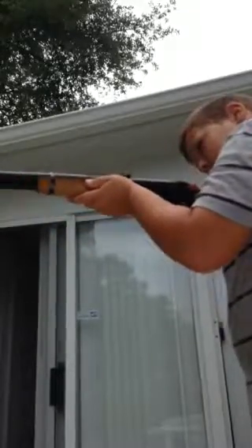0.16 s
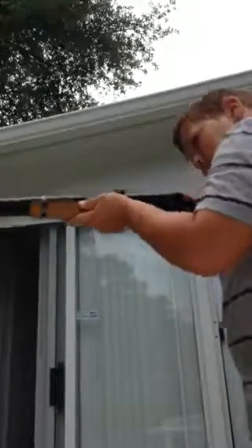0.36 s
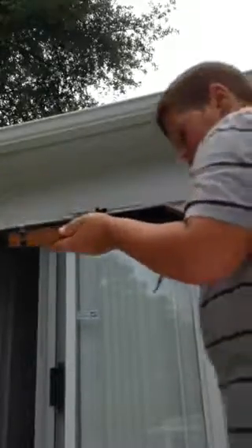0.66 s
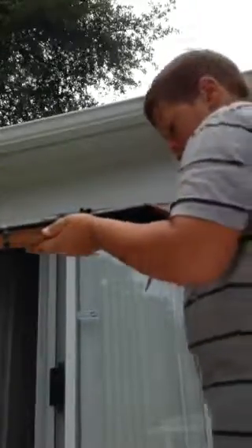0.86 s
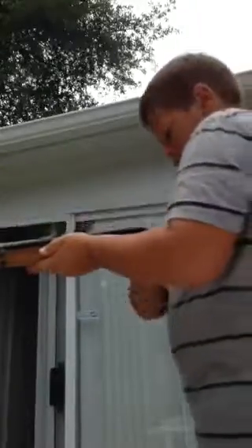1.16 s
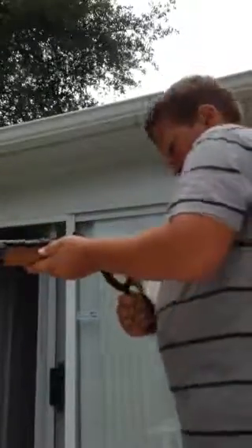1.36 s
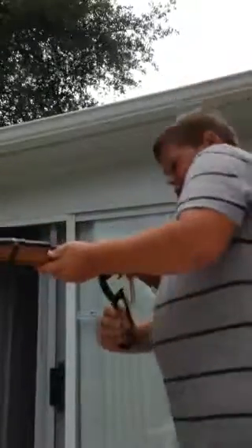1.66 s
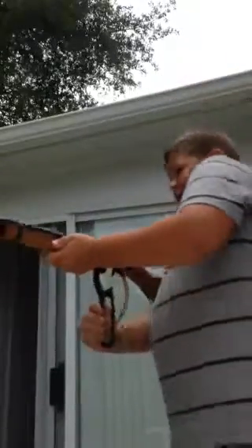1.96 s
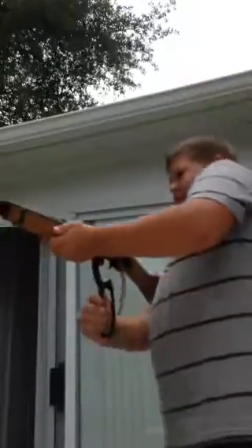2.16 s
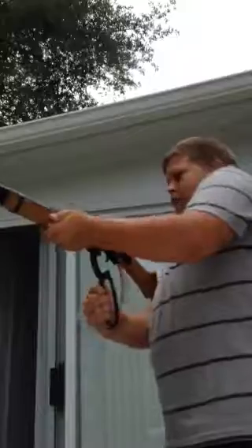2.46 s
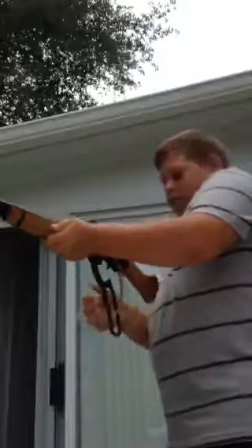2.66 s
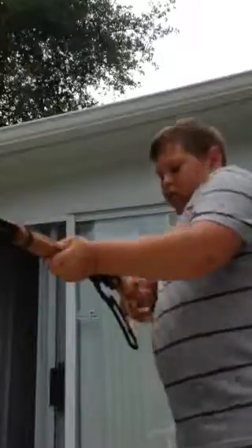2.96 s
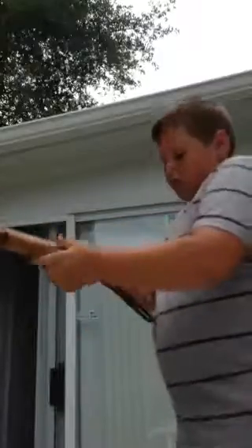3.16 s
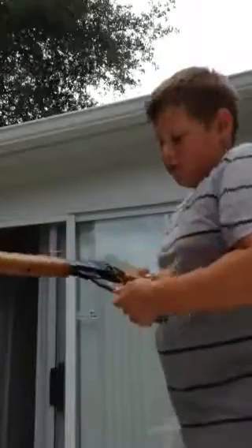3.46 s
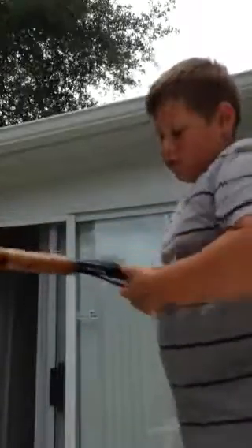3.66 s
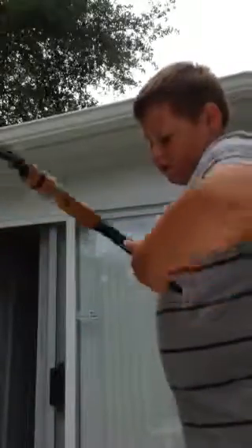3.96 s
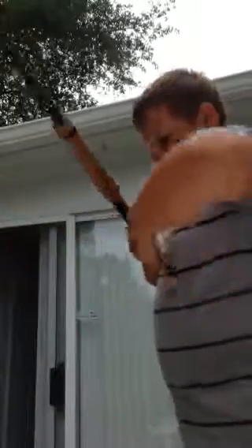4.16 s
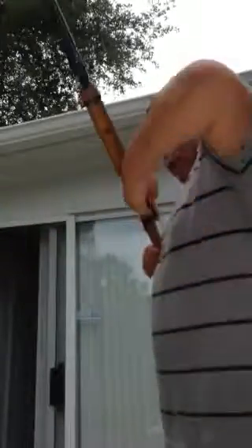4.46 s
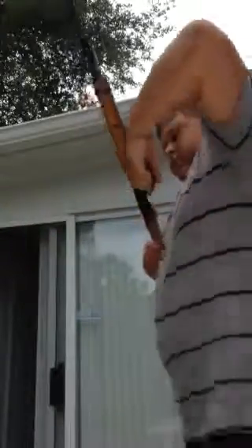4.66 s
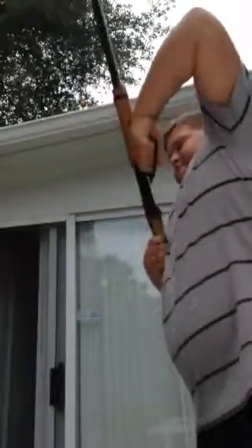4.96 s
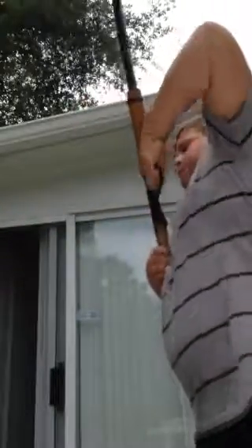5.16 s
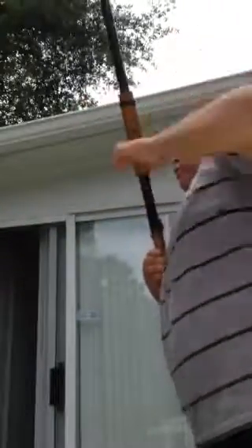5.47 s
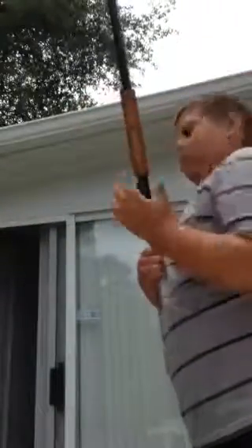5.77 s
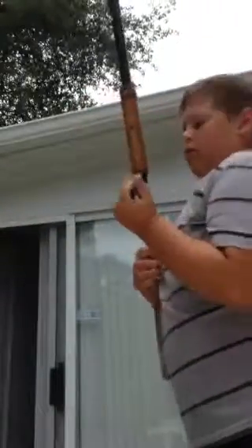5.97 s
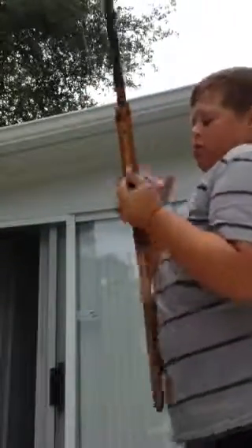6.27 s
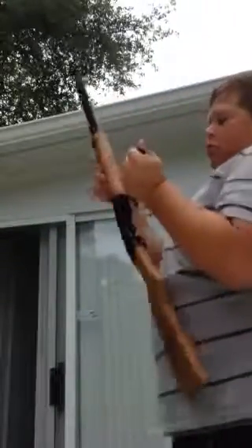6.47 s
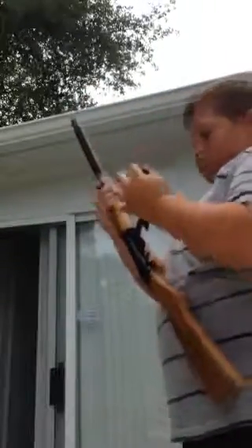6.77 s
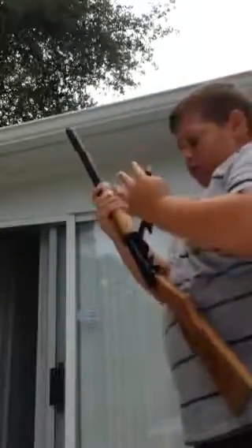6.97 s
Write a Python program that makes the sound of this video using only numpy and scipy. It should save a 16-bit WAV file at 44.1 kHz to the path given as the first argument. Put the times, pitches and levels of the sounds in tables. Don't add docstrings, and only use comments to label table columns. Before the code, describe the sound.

An air rifle is handled close to the microphone on a patio. Bright pellet ticks and short rolls come first, then two hard metallic lever clacks. More pellets scatter, then the whole load rushes down the tube amid three harder snaps. Smaller rattles and soft wood-and-metal knocks finish it. Wall and eave return short, scattered echoes over a faint fan hum, insects, far birds and airy hiss.

```python
import sys
import numpy as np
from scipy import signal
from scipy.fft import rfft, irfft
from scipy.io import wavfile
from scipy.ndimage import uniform_filter1d

SR = 44100
rng = np.random.default_rng(int(sys.argv[2]) if len(sys.argv) > 2 else 0)


def voltage_ratio(decibels):
    exponent = np.asarray(decibels, float) / 20
    return 10 ** exponent


def master(y):
    cut = np.clip(np.atleast_2d(y).T, -1, 1)
    pcm = np.round(cut * 32767)
    wavfile.write(sys.argv[1], SR, pcm.astype(np.int16))


N = 313992


def latches():
    # start in seconds, then the peak in dB
    snaps = [
        (1.6784, -19, -13.5, -18.5, -30.5),
        (2.004, -21, -13, -16, -33),
        (4.3586, -15, -10, -14, -25),
        (4.5944, -10.5, -17, -12, -28),
        (4.8414, -10.5, -15.5, -15, -26),
    ]
    # start in seconds, lever peak in dB, tube and stock in dB
    # against the lever, pitch of the lever's ring in Hz.
    soft_knocks = [(1.074, -54, 2.5, 6, 1699), (1.113, -45, 5.5, 5.5, 2917),
                   (2.2455, -52.5, -14.5, -17, 2398), (3.601, -49.5, -14.5, 1, 3817),
                   (3.6977, -37, -15, 5, 1926), (5.544, -50.5, -8.5, -10.5, 2400),
                   (6.099, -47, -4.5, -19, 2376), (6.388, -45.5, -5.5, -13, 2230),
                   (6.403, -64.5, -4, 17, 790), (5.115, -59, -5, 10.5, 2299), (5.528, -69, 0, 17.5, 789.3),
                   (6.598, -39, 2, -0.5, 2220), (6.63, -48.5, -9, -16, 3867), (6.689, -51, -4.5, -20, 2428),
                   (6.764, -47.5, 1.5, -7, 2537), (6.771, -47, 3, -7, 2252), (6.795, -58.5, -2, -12, 3910),
                   (6.853, -47.5, -7.5, -15, 2291), (6.936, -52, -15.5, -4, 2258),
                   (6.951, -55, -17.5, -10.5, 2246), (7.0146, -37.5, -6.5, -4.5, 2248)]
    blows = [(*row, 2215) for row in snaps]
    for start, lever, tube, stock, ring_hz in soft_knocks:
        receiver = 0.774 * tube - 1.0
        blows.append((start, lever + tube, lever + receiver, lever, lever + stock, ring_hz))
    out = np.zeros(N)
    for start, *levels_db, ring_hz in blows:
        lever_db = levels_db[2]
        contact_s = .0024 if lever_db > -30 else .0036
        add(out, start, strike(parts(ring_hz, lever_db), levels_db, contact_s, .0005, 0))
    return out


def ticks(answers):
    # start
    # in seconds, tube peak in dB, receiver in dB against the tube.
    tube_ticks = [(0.6632, -27.5, -10.5), (0.6788, -32, -11.5), (0.6875, -34.5, -16.5),
                  (0.773, -30, -13), (0.7879, -46.5, -1.5), (0.815, -46.5, -13.5), (0.9411, -40.5, -18),
                  (0.968, -34, -7), (0.9894, -38, -9.5), (1.0082, -38.5, -7), (1.0279, -32.5, -7.5),
                  (1.0405, -27.5, -14), (1.0513, -23.5, -9.5), (1.1444, -37, -8), (1.1568, -37, -2),
                  (1.2058, -37, -2), (1.2245, -44, 0), (1.2341, -46, -3.5), (1.6625, -22, -7.5),
                  (2.1163, -48, -2.5), (2.3032, -49.5, -11.5), (2.362, -48.5, -9), (2.3801, -48, -2),
                  (2.431, -35.5, -15), (2.442, -34, -7.5), (2.5125, -36, -6.5), (2.6169, -32, -23.5),
                  (2.6333, -39.5, -6.5), (2.6585, -39, -19.5), (2.6844, -42, -5.5),
                  (3.172, -42.5, -4), (3.2701, -41, -10), (3.336, -25, -2), (3.392, -41, -18),
                    (3.434, -48, 3.5), (4.2067, -36.5, -17.5), (4.2198, -30.5, -15.5),
                    (4.2459, -25.5, -9.5), (4.2641, -23.5, -15), (4.2771, -28.5, -19), (4.292, -22, -19.5),
                    (4.307, -23, -24), (4.316, -39.5, -7), (4.3374, -29, -7.5), (4.347, -25.5, -3.5),
                    (4.7812, -40, -15.5), (4.745, -38, -15), (5.0578, -53, -7.5), (5.0858, -38.5, -6.5),
                    (5.1522, -33, -21.5), (5.209, -42, -14), (5.236, -26.5, -15.5), (5.254, -37.5, -13),
                    (5.656, -37, -14), (6.42, -39, -5), (6.492, -36, -20.5), (6.5133, -30.5, -5.5),
                    (6.543, -47, -7.5), (6.7566, -34.5, -18.5)]
    landings = [(1.675, -29.5, -9), (1.994, -39.5, -14), (2.0933, -55.5, 6.5), (2.9562, -53, 5.5),
                (2.9627, -45.5, -4), (3.0946, -57.5, 3.5), (3.1259, -55, 2.5), (3.3038, -21.5, -6.5),
                (3.309, -21.5, -2.5), (3.3191, -26.5, 0.5), (3.345, -28, -5.5), (3.3745, -42, 6.5),
                (4.6361, -34.5, -8.5), (4.838, -38, -6.5), (5.129, -30, -12.5), (5.1331, -31, -5),
                (6.3593, -35, -15), (6.448, -31, -7.5), (6.4511, -35, -18.5)]
    out = np.zeros(N)
    for rows, lever_db in [(tube_ticks, -32.5), (landings, -10.5)]:
        for start, db, receiver_db in rows:
            levels_db = [db, db + receiver_db, db + lever_db]
            add(out, start, strike(answers[:3], levels_db, .0014, .0003, -5))
    return out


def strike(answers, levels_db, contact_s, rise_s, echo_db):
    echo_tone_db = [
        -2.5,
        -1.4489,
        3.8143,
        2.1535,
    ]
    t = np.arange(SR // 5) / SR
    burst = np.exp(-(t / contact_s) ** 1.5) * np.minimum(t / rise_s, 1)
    out = 0
    for part, (db, answer, tone_db) in enumerate(zip(levels_db, answers, echo_tone_db)):
        hit = [1] if part == 3 else burst[:600] * rng.standard_normal(600)
        blow = signal.fftconvolve(hit, answer)
        strength = np.sqrt(np.mean(blow[:round(1.3 * contact_s * SR)] ** 2))
        scattered = signal.fftconvolve(echo() * rng.standard_normal(len(t)), answer)
        both = scattered * voltage_ratio(echo_db + tone_db) / np.linalg.norm(answer)
        both[:len(blow)] += blow / strength
        out = out + voltage_ratio(db - 9) * both
    return out


def parts(lever_hz=None, lever_db=0):
    part_bands = [
        (8000, 16000),
        (4000, 8000),
        (2100, 4000),
        (620, 1500),
    ]
    # centre in Hz, width in Hz, height over the band in dB.
    part_humps = [
        [(9700, 700, 4), (12100, 1300, 10), (13700, 900, 7)],
        [(4200, 700, 8), (5100, 300, 5), (7000, 500, 8)],
        [(2250, 180, 9), (3500, 700, 9)],
        [(790, 80, 13), (1050, 110, 7), (1280, 110, 10)],
    ]
    answers = [colour(band, humps) for band, humps in zip(part_bands, part_humps)]
    if lever_hz:
        soft = lever_db < -30
        lever_humps = [(lever_hz, 200, 14 if soft else 9), (3200, 800, 2 if soft else 8)]
        answers[2] = colour((1400, 4000), lever_humps)
        if soft and lever_hz > 1000:
            answers[3] = colour((700, 1800), [(790, 60, 10), (1050, 90, 11), (1290, 110, 15)])
        else:
            wood = colour((640, 1500), [(779.45, 73.86, 15.478), (1287.9, 233.1, 7.62)])
            thump = colour((220, 600), [])
            answers[3] = wood + voltage_ratio(-2.5) * thump
    return answers


def colour(band, humps):
    hz = np.fft.rfftfreq(4096, 1 / SR) + 1
    power = 1 + sum(voltage_ratio(2 * db) / (1 + (2 * (hz - f) / width_hz) ** 2) for f, width_hz, db in humps)
    power = power / (1 + (band[0] / hz) ** 8) / (1 + (hz / band[1]) ** 8)
    cepstrum = irfft(np.log(power + 1e-9) / 2)
    cepstrum[1:2048] *= 2
    cepstrum[2049:] = 0
    return irfft(np.exp(rfft(cepstrum)))[:2048]


def add(mix, start, sound):
    part = mix[round(start * SR):][:len(sound)]
    part += sound[:len(part)]


def pellets(answers):
    # level in dB against the tube, dB gained per dB of weight.
    roll_shares = [
        (0, 0),
        (-7, .5),
        (-12.5, 1.1307),
        (-28.5, 1.7053),
    ]
    pellets_per_s, spread_db = 3500, 3.5
    bounce = voltage_ratio(-60 * np.arange(500) / SR / .009)
    out = np.zeros(N)
    for start, level_db, weight_db, stock_db in rolls():
        count = len(level_db)
        share = np.clip(voltage_ratio((level_db + 36) * .6), .22, 1)
        size = voltage_ratio(spread_db * np.minimum(rng.exponential(1, count), 4))
        hits = size * (rng.random(count) < share * pellets_per_s / SR)
        crowd = signal.fftconvolve(hits / np.sqrt(share), bounce)[:count]
        crowd = crowd * signal.windows.tukey(count, .05)
        for answer, (part_db, deep), more_db in zip(answers, roll_shares, [0, 0, 0, stock_db]):
            rattle = signal.fftconvolve(crowd * rng.standard_normal(count), answer)[:count]
            add(out, start, voltage_ratio(level_db + part_db + more_db + deep * weight_db) * evened(rattle))
    return out


def rolls():
    # time in seconds, tube level in dB, weight in dB.
    load_slide = [
        (4.17, -72.5, 14),
        (4.215, -51, 1.5),
        (4.31, -39.5, -4),
        (4.4, -37.5, -1.5),
        (4.5, -38.5, -3),
        (4.59, -32, -2.5),
        (4.69, -34, 0.5),
        (4.72, -47.5, 3),
        (4.81, -63.5, 10.5),
    ]
    # start,
    # fastest moment and end in seconds, tube level in dB, weight in dB.
    tilt_rolls = [(0.93, 0.967, 1.0995, -51, -3), (1.033, 1.08, 1.273, -45.5, 0),
                  (1.099, 1.116, 1.13, -56, 13.5), (2.397, 2.431, 2.4938, -52, -1.5),
                  (2.49, 2.517, 2.682, -54.5, -3.5), (2.598, 2.638, 2.7465, -54.5, -3.5),
                  (3.26, 3.28, 3.4346, -38, 1.5), (3.394, 3.447, 3.5553, -69.5, 13),
                  (3.953, 4.059, 4.149, -67.5, -9), (5.088, 5.119, 5.2351, -50, -0.5),
                  (5.221, 5.243, 5.2674, -52.5, 2), (6.36, 6.447, 6.48, -53, 6),
                  (6.479, 6.5, 6.584, -52.5, 3), (6.562, 6.589, 6.5867, -50, 3),
                  (6.662, 6.715, 6.8305, -64.5, 12), (6.746, 6.773, 6.83, -55, 8.5)]
    s, db, weight = np.transpose(load_slide)
    t = np.arange(s[0], s[-1], 1 / SR)
    all_rolls = [(s[0], np.interp(t, s, db), np.interp(t, s, weight), 6.5)]
    for start, fastest, end, tube_db, weight_db in tilt_rolls:
        all_rolls.append((start, tube_db + arch(start, fastest, end, -28, 2.0921), weight_db, 0))
    return all_rolls


def arch(start, top, end, ends_db, rounded):
    t = np.arange(start, end, 1 / SR)
    return ends_db * np.interp(t, [start, top, end], [1, 0, 1]) ** rounded


def evened(x):
    return x / np.sqrt(np.mean(x ** 2) + 1e-20)


def echo():
    arrives_s, holds_s = 0.0024635, 0.011952
    t = np.arange(SR // 5) / SR
    near = voltage_ratio(-15.5 - 60 * np.maximum(t - holds_s, 0) / 0.07826)
    yard = voltage_ratio(-30.5 - 60 * t / 0.4574)
    return np.minimum(t / arrives_s, 1) ** 1.135 * np.hypot(near, yard)


def patio(x):
    turn = 2 * np.pi * np.arange(N) / SR / .23
    shares = [np.sqrt(2 / 3) * np.cos(turn + k * np.pi / 3) for k in range(3)]
    paths = echo() * rng.standard_normal((3, SR // 5)) / np.linalg.norm(echo())
    return sum(signal.oaconvolve(x * share, path)[:N] for share, path in zip(shares, paths))


def drones():
    # pitch in Hz, width in Hz, level in dB.
    hum_lines = [
        (40.805, 7.3, -77),
        (62.375, 6.5, -85),
        (78.48, 3.9, -68.5),
        (122.64, 5.043, -66.5),
        (156.75, 7.87, -74),
        (2447.5, 22.86, -80.5),
        (3286.9, 67.74, -81),
        (5673, 200, -90),
    ]
    return sum(voltage_ratio(db) * fuzz(np.full(N, hz), width_hz) for hz, width_hz, db in hum_lines)


def fuzz(hz, width_hz):
    r = np.exp(-np.pi * width_hz / SR)
    count = len(hz) + SR
    noise = rng.standard_normal(count) + 1j * rng.standard_normal(count)
    slow = signal.lfilter([1], [1, -2 * r, r * r], noise)[SR:]
    return evened((slow * np.exp(2j * np.pi * np.cumsum(hz) / SR)).real)


def birds():
    # start in seconds, length in seconds, first pitch in Hz, level in dB.
    bird_whistles = [(1.22, .31, 3500, -71), (3.38, .3, 3450, -68), (4.69, .19, 3450, -70),
                     (6.13, .27, 3430, -70)]
    # start in seconds, length in seconds, first and last pitch in Hz,
    # level in dB.
    bird_chirps = [
        (2.75, 0.0767, 7020, 6880, -76.5),
        (6.245, 0.2046, 7568, 6176, -70),
        (6.862, 0.28, 7200, 6950, -71.5),
    ]
    sag_hz_per_s, whistle_blur_hz, chirp_blur_hz = 1150, 23, 230
    calls = [(start, length, hz, hz - sag_hz_per_s * length, db, whistle_blur_hz, 1)
             for start, length, hz, db in bird_whistles]
    calls += [(*row, chirp_blur_hz, 0) for row in bird_chirps]
    out = np.zeros(N)
    for start, length, hz, last_hz, db, blur_hz, pure in calls:
        swell_db = arch(0, 0.425 * length, length, -7, 1.51)
        pitch = np.linspace(hz, last_hz, len(swell_db))
        clear = pure * np.sqrt(2) * np.sin(2 * np.pi * np.cumsum(pitch) / SR)
        call = evened(clear + .6 * fuzz(pitch, blur_hz))
        add(out, start, voltage_ratio(db + swell_db) * call * signal.windows.tukey(len(pitch), .2))
    return out


def air():
    # frequency in Hz, level in dB per Hz.
    air_tone = [(22, -34), (34, -21.5), (70, -3), (200, -15.5), (400, -19), (800, -22), (1600, -27),
                (3000, -29), (5500, -26.5), (7000, -32), (10000, -31), (11500, -37), (15500, -37),
                (17000, -52)]
    # time in seconds, change in dB.
    breeze_drift = [(0, -1.5), (1, 0.4789), (2, -0.989), (3, 0.417), (3.8, -0.58), (4.05, 0.5), (5, -1),
                    (6, 0.1838), (7.12, -2)]
    frames, hz = N // 512 + 5, np.fft.rfftfreq(2048, 1 / SR)
    a, b, patches = rng.standard_normal((frames, 1025, 3)).T
    patches = uniform_filter1d(patches, size=24, axis=0)
    patches = evened(uniform_filter1d(patches, size=10, axis=1))
    drift_db = np.interp(np.arange(frames) * 512 / SR, *np.transpose(breeze_drift))
    breeze_db = drift_db * np.clip(hz / 8000, 0, 2)[:, None]
    z = (a + 1j * b) * voltage_ratio(read(air_tone, hz)[:, None] + 0.8605 * patches + breeze_db)
    return voltage_ratio(-61) * evened(signal.istft(z, nperseg=2048, noverlap=1536)[1][:N])


def read(points, hz):
    f, value = np.transpose(points)
    return np.interp(np.log(hz + 1), np.log(f + 1), value)


def scene():
    answers = parts()
    roll = voltage_ratio(-2.0) * pellets(answers)
    rifle = latches() + ticks(answers) + roll + voltage_ratio(-8.5) * patio(roll)
    return (rifle + drones() + birds() + air())[None]


def band_limit(x):
    return signal.sosfilt(signal.butter(12, 16650, fs=SR, output="sos"), x)


def record(dry):
    limited = signal.oaconvolve(dry, signal.firwin(255, 15300, fs=SR)[None], "same")
    return band_limit(limited)


dry = scene()
out = record(dry)
master(out)
```